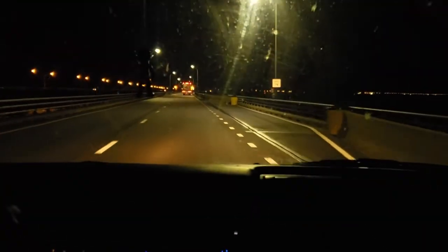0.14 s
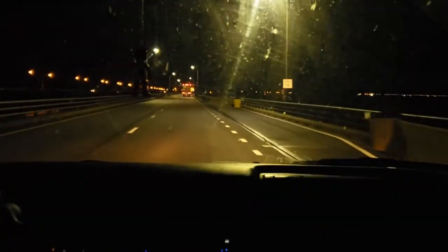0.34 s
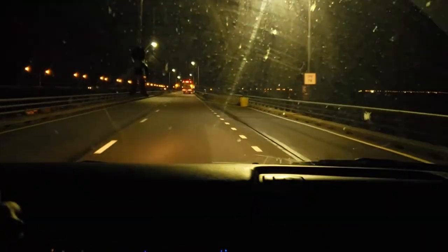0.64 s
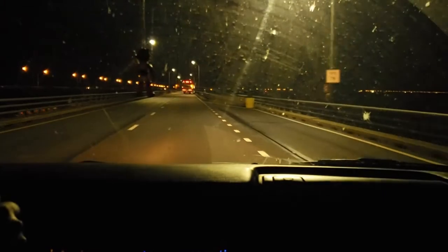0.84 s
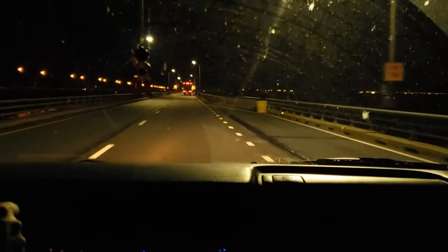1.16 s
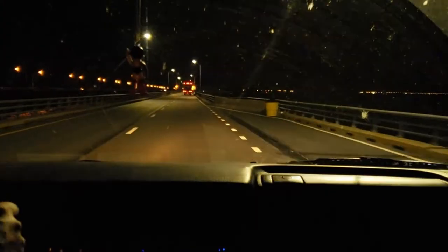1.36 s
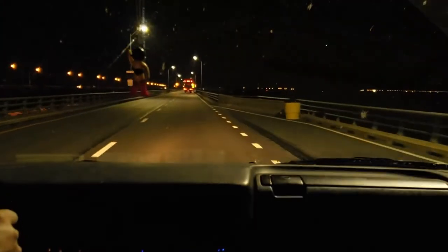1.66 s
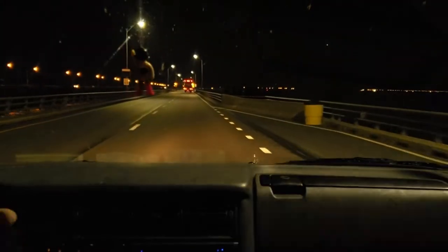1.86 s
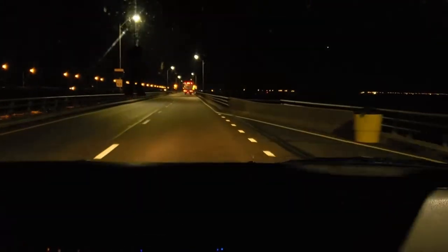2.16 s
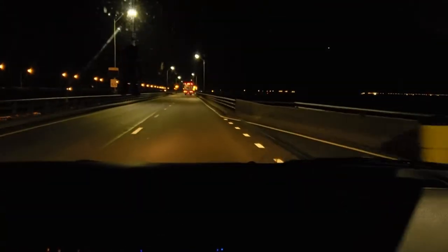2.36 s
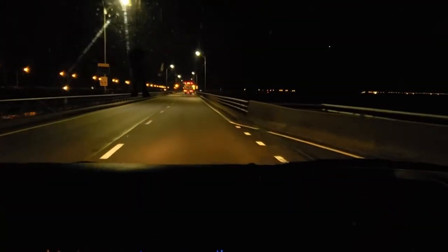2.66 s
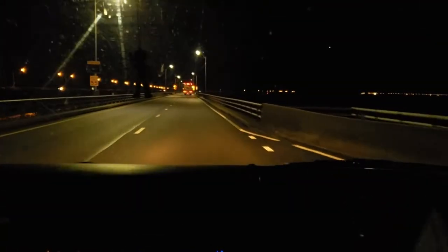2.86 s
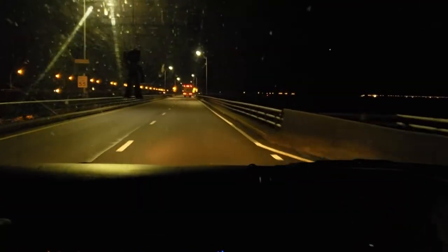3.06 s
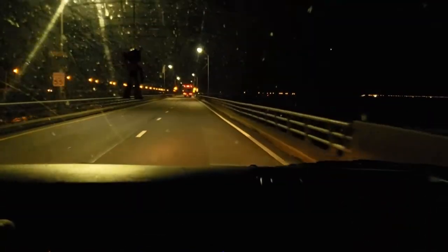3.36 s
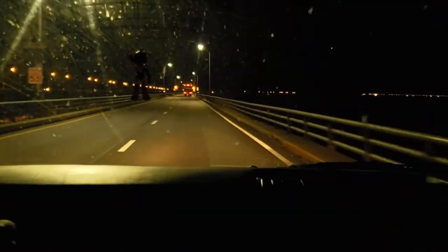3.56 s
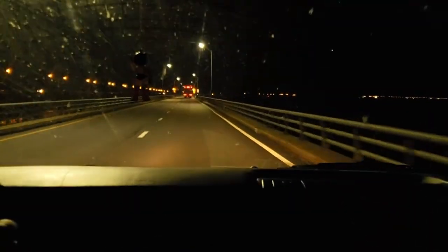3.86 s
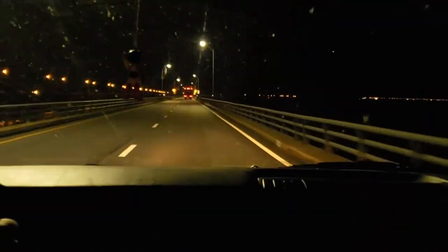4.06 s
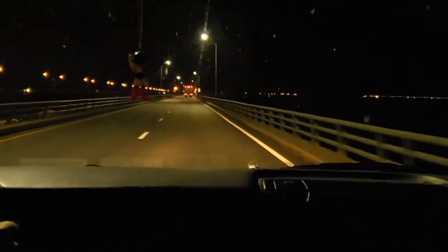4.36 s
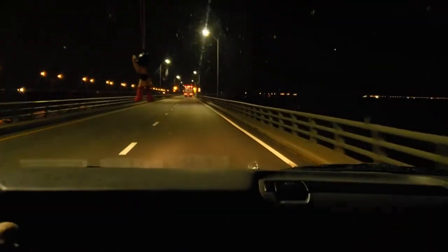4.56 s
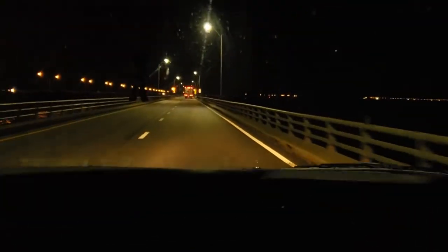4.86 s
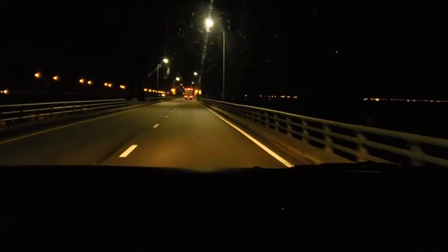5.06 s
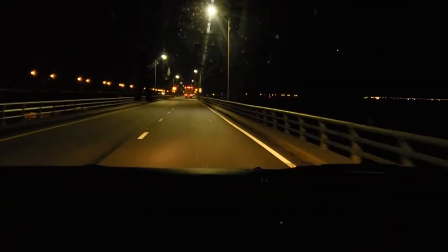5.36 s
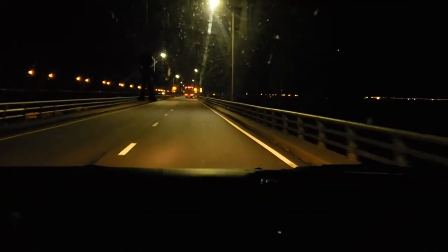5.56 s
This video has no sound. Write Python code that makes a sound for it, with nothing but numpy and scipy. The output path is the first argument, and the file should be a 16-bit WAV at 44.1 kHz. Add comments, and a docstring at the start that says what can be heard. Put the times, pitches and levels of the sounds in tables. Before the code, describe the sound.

Heard inside a van cruising at night on a multi-lane road: a low, slightly wavering engine drone, boomy body rumble, tyre roar and faint air hiss. About a second and a half in, a finger scrapes and knocks the hand-held camera, mostly scratchy on the right. The cabin noise dips afterwards, then slowly returns, with soft thumps from road seams.

```python
"""Inside a van at highway speed, heard through the left and right microphone ports of a hand-held camera.
The engine drones as sines locked to its cycle, with whines geared to it; seams thump as damped rings.
Body boom, tyre roar and air hiss are coloured noise, partly alike at both ports.
At the microphone a finger scrapes over the right port in stick-slip rings and noise, and knocks the case.
Around the knocks the cabin sound sinks, stays low and creeps back.
"""
import sys
import numpy as np
from scipy import signal
from scipy.fft import rfft, irfft, next_fast_len
from scipy.io import wavfile
from scipy.ndimage import uniform_filter1d, map_coordinates

SR = 44100
rng = np.random.default_rng(int(sys.argv[2]) if len(sys.argv) > 2 else 0)


def dump_mix(stems):
    """Bounce the given channels to the path in sys.argv[1] as a 16-bit WAV at rate SR."""
    frames = np.atleast_2d(stems).T  # one column per channel
    limited = np.clip(frames, -1, 1)  # hard clip at full scale
    pcm = np.round(limited * 32767).astype(np.int16)
    wavfile.write(sys.argv[1], SR, pcm)


N = 252252  # samples, 5.72 s

# Cabin levels below are those at the ports before the finger muffles or the cabin sinks.
# A five-cylinder cycle (two turns of the crank) that slows a little
CYCLE_HZ, CYCLE_SAG_HZ_PER_S, CYLINDERS = 24.315, 0.081, 5
# Firing tone of the engine, mean of both ports: time_s, level_db (rms)
FIRING_LEVEL = [(0, -30), (.55, -33), (.9, -27.5), (1.3, -29), (1.8, -33), (2.2, -25), (2.6, -27.5),
                (3, -24.5), (3.5, -28), (4.1, -29.5), (4.5, -27), (5.2, -27), (5.72, -23.5)]
FIRING_LEAN_DB = -1.5  # left over right
# Other engine orders; unequal cylinders give those between the firing overtones:
# multiple_of_cycle, level_db (rms), left_over_right_db
ENGINE_ORDERS = [(1.974, -39.5, 0.1), (3.976, -42, 5.5), (6.96, -51.5, -7), (7.93, -51, -3),
                 (8.97, -47.5, 1), (10.015, -34, -0.5), (12.1, -51, 1), (12.95, -51.5, .9),
                 (13.98, -48.5, -4), (14.98, -45, 0.1), (15.84, -58, -.9), (18.98, -58, .1),
                 (19.86, -54, -2.1), (21.9, -61, 1), (26.04, -61, 0), (28, -62, .1), (29.5, -59, 3),
                 (35.7, -62, 2), (40.3, -63, .1)]
# Belt and gear tones: multiple_of_cycle, level_db (rms at the start), pitch_waver_hz
GEAR_WHINES = [(24.04, -50, 0.22), (31, -62.5, 0.48), (62.2, -70, 1.2), (65, -67.5, 1.24), (85, -66, 1.76)]
WHINE_GROWS_DB_PER_S = 1.1

# Levels of the body boom, tyre roar and air hiss, each: time_s, level_db (rms)
BOOM_LEVEL = [(0, -29), (.22, -23), (.62, -25), (.93, -21), (1.2, -20.5), (1.33, -30), (1.5, -22.5),
              (1.85, -26), (2.05, -23.5), (2.25, -25.5), (2.9, -23.5), (3.3, -24), (3.55, -27), (4.3, -27),
              (4.85, -23), (5.05, -30.5), (5.32, -25.5), (5.72, -25)]
ROAR_LEVEL = [(0, -33.5), (.2, -31.5), (.62, -31), (1.15, -33), (1.36, -30.5), (1.52, -32), (1.75, -30.5),
              (2.25, -32), (2.9, -31), (3.3, -33), (3.6, -33), (3.78, -29), (3.95, -32), (4.3, -31),
              (4.9, -32.5), (5.72, -31.5)]
HISS_LEVEL = [(0, -51), (.2, -49.5), (.35, -51.5), (.9, -53.5), (1.19, -57), (1.32, -48.5), (1.46, -54),
              (1.8, -51.5), (2.6, -54), (3.1, -53), (3.6, -55.5), (3.7, -49), (3.79, -48), (3.87, -52),
              (4.3, -51.5), (4.9, -52.5), (5.72, -51.5)]
BUMP_SWING_DB, BUMPS_PER_S = 1, 12  # bumps in the surface swing the boom
# Relative spectra of the three noises, each: frequency_hz, density_db (per Hz)
BOOM_SPECTRUM = [(15, -40), (24, -22), (31, -11), (38, -11.5), (48, 1.5), (65, -3), (95, -7.5), (130, -7),
                 (165, -17), (220, -27), (400, -63)]
ROAR_SPECTRUM = [(110, -6.5), (170, 3.5), (230, 3), (330, 2), (400, -0.5), (520, -2), (700, -9), (1000, -4),
                 (1400, -6.5), (1800, -12.5), (2300, -13.5), (3000, -16), (3600, -23.5), (6000, -48.5)]
HISS_SPECTRUM = [(2000, -10), (4000, 3), (5200, -1), (5900, -4), (6500, -2), (8200, -6.5), (9500, -4),
                 (11500, -4), (13000, -8.5), (15700, -19)]
# Panels and trim that the roar rings: centre_hz, width_hz, boost_db
PANEL_RESONANCES = [(220, 22, 3.5), (293, 24, 3.5), (337, 20, 1.5), (443, 16, 2), (633, 76, 3),
                    (1556, 74, 5), (1910, 68, 6), (2065, 64, 8.5), (3260, 150, 2)]
# Seams in the road: time_s, level_db (peak before damping and soft start), ring_hz
ROAD_SEAMS = [(0.19, -7, 50), (0.741, -6.5, 58.3), (1.021, -7, 54.6), (1.89, -6, 62), (3.929, -5.5, 72),
              (3.94, -7, 68), (4.009, -7.5, 74), (4.876, -2.5, 74.4), (4.937, -3.5, 95), (5.079, -7, 59)]

# Cabin noise between the two ports: frequency_hz, likeness (0-1, clipped to that range)
PORT_LIKENESS = [(40, 0.8), (90, 1.05), (170, 0.8), (260, 1), (420, 0.8), (800, 0.13), (1300, .8),
                 (1550, 0.66), (1800, 0.84), (2400, 0.07), (3000, 0.48), (4500, 0.37), (8000, -0.36),
                 (12000, 0)]
# Phase of the shared noise between the ports: frequency_hz, left_lead_rad
PORT_LEAD = [(300, 0), (500, -1.5), (680, -0.53), (1290, -3), (2000, -4.5), (2930, -6.5), (4000, -3),
             (4800, -0.5), (5600, 0), (6500, 6), (8000, 4)]
# Noise balance between the ports: frequency_hz, left_over_right_db
PORT_LEAN = [(60, 0.46), (110, -0.8), (200, 1.5), (380, -0.1), (700, -1.5), (1290, -0.64), (2380, -1.5),
             (4400, -1.5), (8120, -0.2), (15000, 0.5)]

# The cabin sinks around the knocks, stays low and creeps back
SINK_AT_S, SINK_DB, SINK_FALL_S, SINK_HOLD_S, SINK_BACK_S = 1.42, -4.5, 0.045, 1, 0.91
# The fingertip seals the right port against bass: start_s (fully sealed), length_s
FINGER_SEALS = [(1.369, 0.085), (1.488, 0.055), (1.572, .015), (1.642, .015)]
SEAL_DB, SEAL_EDGE_S = -28, 0.012
# Bass lost while the finger stays near
HOVER_DB, HOVER_FROM_S, HOVER_HOLD_S, HOVER_LIFT_S = -3.5, 1.378, 0.25, 0.35
# Treble lost under the firmest press
SHADE_DB, SHADE_AT_S, SHADE_FALL_S, SHADE_HOLD_S, SHADE_BACK_S = -11, 1.44, 0.011, 0.033, 0.12

# Knocks on the case: time_s, left_level_db, right_level_db (peak before damping), ring_hz
CASE_KNOCKS = [(1.432, -11, -42, 70), (1.445, -8.5, -43, 130), (1.4576, -5, -30, 93),
               (1.463, -30, -13, 100), (1.468, -6, -29, 170), (1.477, -11, -24, 206),
               (1.551, -17, -34, 130)]
# The case rattles with every knock: pitch, level below the knock, cycles to die by 60 dB
CASE_HZ, CASE_DB, CASE_CYCLES = 427, -13.5, 9
# Slips of the finger on the right port: time_s, level_db (before damping and port bass cut), ring_hz
FINGER_SLIPS = [(1.3797, -9, 1120), (1.389, -6.5, 1300), (1.39, -5, 2500), (1.395, -10, 1200),
                (1.3995, -2.5, 1470), (1.4018, -7, 890), (1.4107, -5.5, 990), (1.4181, -4, 990),
                (1.4195, -1, 670), (1.422, -5, 624), (1.4273, -10, 800), (1.4287, -12, 1100),
                (1.455, -12, 560), (1.502, -20, 1200), (1.5105, -15, 900), (1.55, -14.5, 450),
                (1.561, -19, 900)]
SLIP_ATTACK_S = 0.0012
# Bright edge: dB gained per dB of slip, level at a full-scale slip, time to die by 60 dB, low-pass
CRACK_GROWS, CRACK_DB, CRACK_T60_S, CRACK_TOP_HZ = 4.3, -3, 0.0075, 2000
# Rubbing under the slips: start_s (full pressure), length_s, level_db (rms before port bass cut)
RUB_STROKES = [(1.384, .035, -22), (1.453, .07, -31), (1.558, .015, -32)]
STROKE_RISE_S, STROKE_FALL_S = 0.031, 0.036


def amp(db):
    """dB to gain."""
    return 10 ** (np.asarray(db) / 20)


def unit(x):
    """Scaled to rms 1."""
    return x / np.sqrt(np.mean(x ** 2) + 1e-20)


def along(points, hz):
    """Value at hz between (Hz, value) points on a log axis."""
    point_hz, value = np.transpose(points)
    return np.interp(np.log(hz + 1), np.log(point_hz + 1), value)


def curve(rows):
    """One value per sample from (s, value) points."""
    time_s, value = np.transpose(rows)
    return np.interp(np.arange(N) / SR, time_s, value)


def wobble(rate):
    """A smooth random curve, rate knots a second."""
    knots = rng.standard_normal(int(N * rate / SR) + 4)
    return map_coordinates(knots, [np.arange(N) * rate / SR])


def span(start_s, hold_s, rise_s, fall_s):
    """0, a rise that reaches 1 at start_s, a hold, a fall to 0."""
    edges = start_s + np.cumsum([-rise_s, rise_s, hold_s, fall_s])
    return np.interp(np.arange(N) / SR, edges, [0, 1, 1, 0])


def filtered(x, response):
    """x times a complex response of frequency."""
    m = next_fast_len(N + SR // 2)
    return irfft(rfft(x, m) * response(np.fft.rfftfreq(m, 1 / SR)), m)[..., :N]


def ring(hz, cycles):
    """A damped swing that dies by 60 dB in so many cycles."""
    turns = np.arange(SR // 5) / SR * hz
    return np.sin(2 * np.pi * turns) * amp(-60 * turns / cycles)


def add(track, s, sound):
    """Mixes a sound into a track at s seconds."""
    part = track[..., round(s * SR):round(s * SR) + sound.shape[-1]]
    part += sound[..., :part.shape[-1]]


def cabin_noise(colour_db, patchy_db):
    """Noise at both ports, rms 1, with time-frequency patches of random gain."""
    spectra = signal.stft(rng.standard_normal((3, N)), nperseg=512)[2]
    field = rng.standard_normal(spectra.shape[1:])
    field = uniform_filter1d(uniform_filter1d(field, size=6, axis=0), size=4, axis=1)
    noise = signal.istft(spectra * amp(patchy_db * unit(field)), nperseg=512)[1][:, :N]
    sides = np.array([[0.5], [-0.5]])

    def share(hz):
        return np.clip(along(PORT_LIKENESS, hz), 0, 1)

    def gain(hz):
        return amp(colour_db(hz) + sides * along(PORT_LEAN, hz))

    def shared_response(hz):
        return gain(hz) * np.sqrt(share(hz)) * np.exp(1j * sides * along(PORT_LEAD, hz))

    # the shared part leads at one port; the diffuse part is each port's own
    shared = filtered(noise[0], shared_response)
    diffuse = filtered(noise[1:], lambda hz: gain(hz) * np.sqrt(1 - share(hz)))
    return unit(shared + diffuse)


def air_hiss(surge):
    """Air noise whose level follows the shared surges and flutters of its own."""
    noise = cabin_noise(lambda hz: along(HISS_SPECTRUM, hz), patchy_db=2.0)
    flutter_db = 0.18 * wobble(35) + 0.44 * wobble(9.8)
    return noise * amp(curve(HISS_LEVEL) + 0.45 * surge + flutter_db)


def body_boom():
    """Low noise of the body shaken by the road surface."""
    noise = cabin_noise(lambda hz: along(BOOM_SPECTRUM, hz), patchy_db=0.3)
    return noise * amp(curve(BOOM_LEVEL) + BUMP_SWING_DB * wobble(BUMPS_PER_S))


def tyre_roar(surge, phase):
    """Tyre noise coloured by ringing panels and pulsed a little by the engine cycle."""
    def colour_db(hz):
        boosts = (db / (1 + (2 * (hz - centre) / width) ** 2) for centre, width, db in PANEL_RESONANCES)
        return along(ROAR_SPECTRUM, hz) + sum(boosts)

    level_db = curve(ROAR_LEVEL) + 0.6 * surge + 0.4 * wobble(8)
    pulse = 1 + 0.055 * np.cos(phase) + 0.055 * np.cos(2 * phase)
    return cabin_noise(colour_db, patchy_db=1.6) * amp(level_db) * pulse


def road_seams():
    """Each seam thumps the body with a soft start, pressure dropping first."""
    track = np.zeros(N)
    soft_start = 1 - amp(-60 * np.arange(SR // 5) / SR / 0.058)
    for s, db, hz in ROAD_SEAMS:
        add(track, s, -amp(db) * ring(hz, 6.5) * soft_start)
    return track


def engine_phase():
    """Phase of the engine cycle in radians, slowing and slightly unsteady."""
    cycle_hz = CYCLE_HZ - CYCLE_SAG_HZ_PER_S * np.arange(N) / SR + 0.032 * wobble(9)
    return 2 * np.pi * np.cumsum(cycle_hz) / SR


def gear_whines(phase):
    """Thin belt and gear tones, geared to the engine with a pitch waver, that grow steadily."""
    tones = np.zeros(N)
    for multiple, db, waver_hz in GEAR_WHINES:
        level = amp(db + 0.37 * wobble(7.1))
        waver = 2 * np.pi * np.cumsum(waver_hz * wobble(12)) / SR
        tones += level * np.sin(multiple * phase + waver)
    return np.sqrt(2) * amp(WHINE_GROWS_DB_PER_S * np.arange(N) / SR) * tones


def engine_drone(phase):
    """Sines at the firing rate and other orders of the cycle, each wavering by itself."""
    sides = np.array([[0.5], [-0.5]])
    orders = [(CYLINDERS, curve(FIRING_LEVEL), FIRING_LEAN_DB)] + ENGINE_ORDERS
    drone = np.zeros((2, N))
    for multiple, db, lean_db in orders:
        level = amp(db + 0.71 * wobble(9) + sides * lean_db)
        drone += level * np.sin(multiple * (phase + 0.02 * sides) + rng.uniform(0, 2 * np.pi))
    return np.sqrt(2) * drone


def muffled(port):
    """A touched port loses bass when sealed or hovered over, treble when pressed."""
    bass = filtered(port, lambda hz: 1 / (1 + (hz / 310) ** 6))
    sealed = sum(span(s, length, SEAL_EDGE_S, SEAL_EDGE_S) for s, length in FINGER_SEALS)
    hover = span(HOVER_FROM_S, HOVER_HOLD_S, SEAL_EDGE_S, HOVER_LIFT_S)
    shade = span(SHADE_AT_S, SHADE_HOLD_S, SHADE_FALL_S, SHADE_BACK_S)
    return amp(SEAL_DB * sealed + HOVER_DB * hover) * bass + amp(SHADE_DB * shade) * (port - bass)


def case_knocks():
    """Dull damped rings through the case at both ports, with its rattle."""
    track = np.zeros((2, N))
    rattle = amp(CASE_DB) * ring(CASE_HZ, CASE_CYCLES)
    for s, left_db, right_db, hz in CASE_KNOCKS:
        add(track, s, amp([[left_db], [right_db]]) * (ring(hz, 5.5) + rattle))
    return track


def finger_rub():
    """Gritty low-passed noise that swells with the pressure of each stroke."""
    grit = rng.standard_normal(N) * amp(3.8 * wobble(300))
    pressure = np.zeros(N)
    for s, length, db in RUB_STROKES:
        pressure += amp(db) * span(s, length, STROKE_RISE_S, STROKE_FALL_S) ** 2
    return pressure * unit(filtered(grit, lambda hz: 1 / (1 + (hz / 520) ** 2)))


def finger_slips():
    """Stick-slip: each release rings at its own pitch and breaks loose with a noise edge."""
    slips, cracks = np.zeros(N), np.zeros(N)
    t = np.arange(SR // 5) / SR
    attack = 1 - amp(-60 * t / SLIP_ATTACK_S)
    cavity = 0.27 * ring(332, 9.1)  # closed by the fingertip
    for s, db, hz in FINGER_SLIPS:
        add(slips, s, amp(db) * (ring(hz, 4.3) + cavity) * attack)
        # the edge grows steeply, so only the harder slips sound bright
        edge_db = CRACK_GROWS * db + CRACK_DB - 60 * t / CRACK_T60_S
        add(cracks, s, amp(edge_db) * rng.standard_normal(len(t)))
    return slips + filtered(cracks, lambda hz: 1 / (1 + 1j * hz / CRACK_TOP_HZ))


def handling():
    """The finger on the right port, cut in the bass, and the knocks on both ports."""
    track = case_knocks()
    track[1] += filtered(finger_slips() + finger_rub(), lambda hz: 1 / (1 + (260 / (hz + 1)) ** 6))
    return track


def scene():
    """The cabin, muffled on the touched side and sinking around the knocks, plus the handling."""
    phase = engine_phase()
    surge = wobble(45)  # of the rough surface, shared by hiss and roar
    noises = air_hiss(surge) + body_boom() + tyre_roar(surge, phase)
    left, right = noises + road_seams() + gear_whines(phase) + engine_drone(phase)
    sink = amp(SINK_DB * span(SINK_AT_S + SINK_FALL_S, SINK_HOLD_S, SINK_FALL_S, SINK_BACK_S))
    return sink * np.array([left, muffled(right)]) + handling()


def record(dry):
    """The camera keeps nothing above its band limit."""
    return filtered(dry, lambda hz: hz < 15720)


dry = scene()
out = record(dry)
dump_mix(out)
```